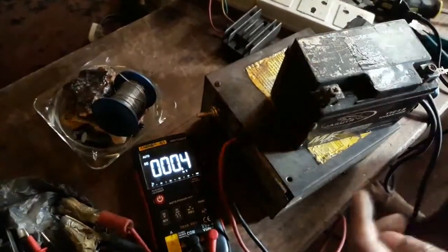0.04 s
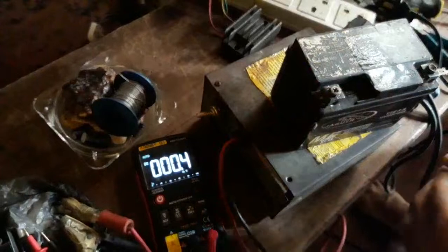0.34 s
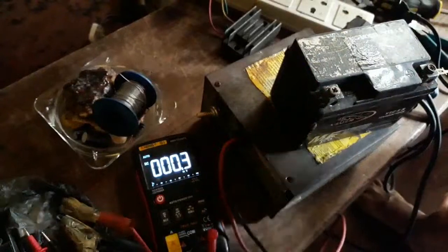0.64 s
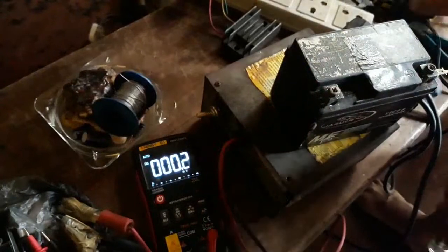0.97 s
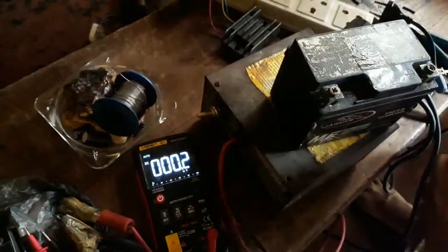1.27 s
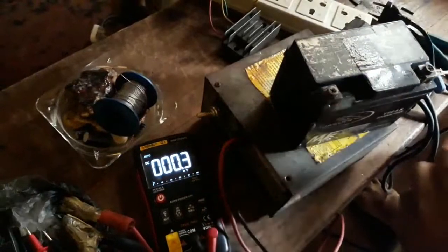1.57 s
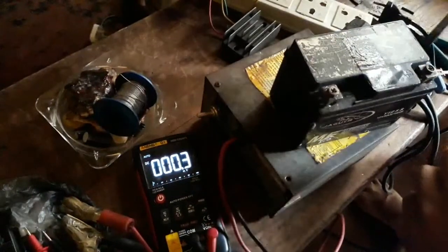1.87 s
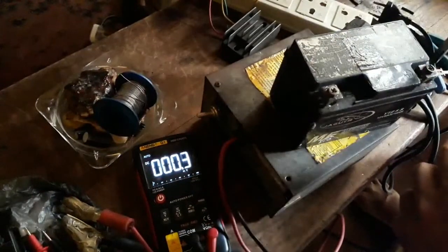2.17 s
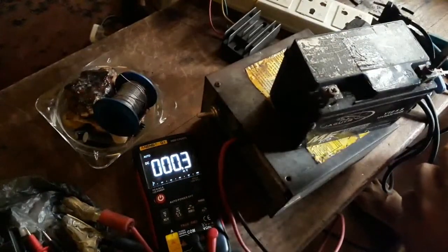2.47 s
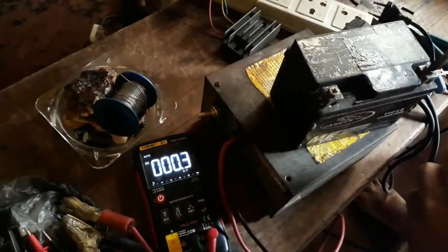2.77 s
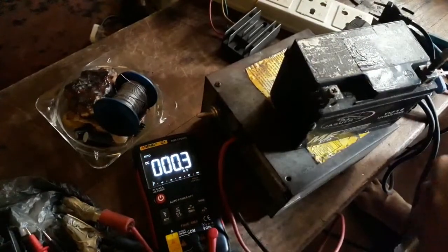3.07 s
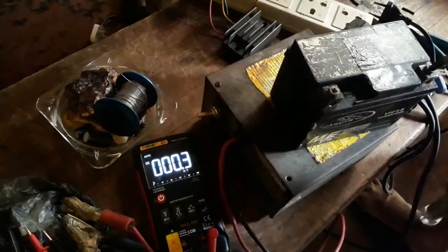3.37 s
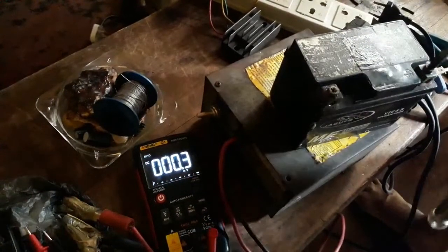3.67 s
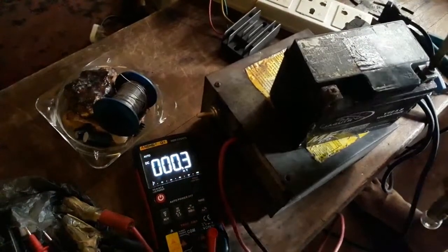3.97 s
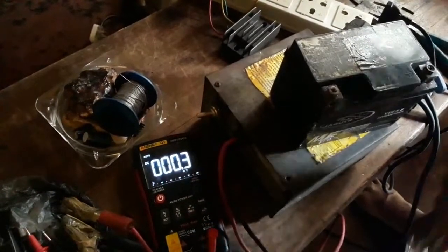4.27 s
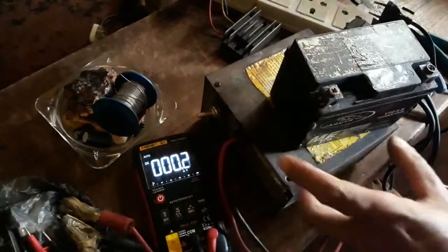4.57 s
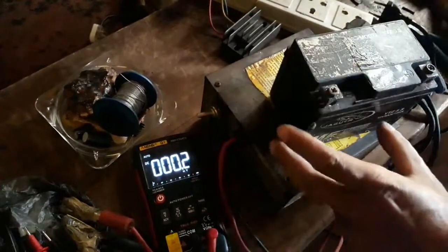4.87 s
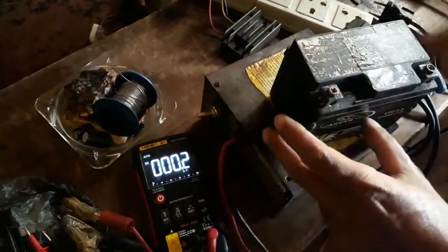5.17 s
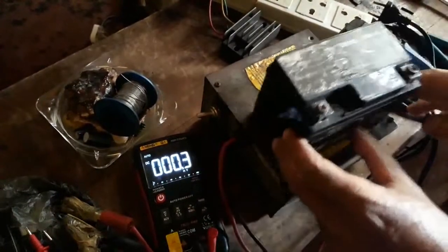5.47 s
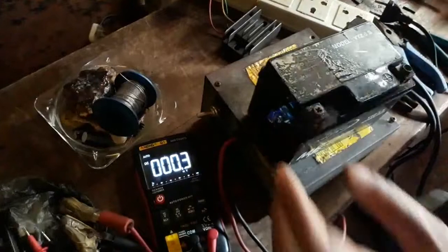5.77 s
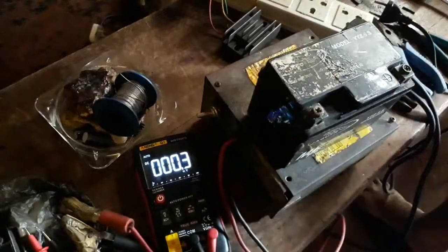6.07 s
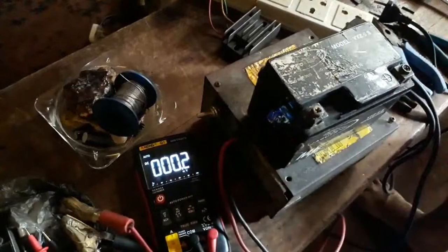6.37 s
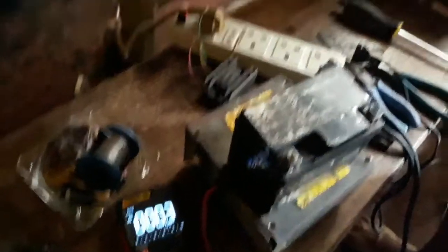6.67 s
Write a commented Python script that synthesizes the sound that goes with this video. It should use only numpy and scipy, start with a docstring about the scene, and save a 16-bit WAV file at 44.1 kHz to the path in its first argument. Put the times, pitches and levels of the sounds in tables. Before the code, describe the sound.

Light clicks and clatters of clip leads on a wooden bench, followed by a knock and a battery's short, jerky scrape.

```python
"""Leads are handled at a small battery that lies on a sheet-metal case on a wooden workbench.
From the start, metal clips tick and land, and cables bump the wood and slide through the fingers.
Just after 1 s a plastic plug clatters down. Near 5 s a hand knocks the battery and a thin metal part
pings; the battery rocks, then scrapes and groans as it is pushed across the case in four jerks.
After 6 s more clips and cables land. A quiet hiss fills the small room throughout."""
import sys
import numpy as np
from scipy import signal
from scipy.fft import rfft, irfft
from scipy.io import wavfile
from scipy.ndimage import uniform_filter1d

SR = 44100
rng = np.random.default_rng(int(sys.argv[2]) if len(sys.argv) > 2 else 0)


def store_pcm(level_fs):
    """Save levels as 16-bit WAV."""
    pcm = np.round(np.clip(level_fs, -1, 1) * 32767).astype(np.int16)
    wavfile.write(sys.argv[1], SR, np.atleast_2d(pcm).T)


N = 296352

# Strengths and gains are relative. A ring_s or rattle_s is the time to fade by 60 dB.
# A blow is weak below low_hz and above bright_hz; the spot that is struck favours spot_hz.
# the hand's knock: start_s, strength_db, low_hz, bright_hz, ring_s, room_db, spot_hz
HAND_KNOCK = [(4.9545, 25, 180, 338, 0.01, -16, 430), (4.9595, 15, 129, 980, 0.048, -3, 162),
              (4.9642, 19, 215, 880, 0.15, -7, 415)]
# the plug landing: start_s, strength_db, low_hz, bright_hz, ring_s, room_db, spot_hz
PLUG_HITS = [(1.1068, 12.5, 150, 1630, 0.052, 3, 855), (1.1098, 12.5, 150, 990, 0.041, -4, 342),
             (1.2826, 19, 266, 2310, 0.053, -4.5, 1660), (1.2852, 15.5, 264, 1960, 0.014, -5.5, 1370),
             (1.2885, 9, 232, 1020, 0.044, -11, 272), (1.3153, 4.5, 500, 2200, 0.033, 2, 1950),
             (1.3183, 15.5, 346, 1900, 0.044, -13, 523)]
# the battery rocking: start_s, strength_db, spot_hz
BATTERY_HITS = [(5.1243, 2, 560), (5.1521, 13, 700), (5.176, 3, 620), (5.2987, 9, 165), (5.3989, 4, 573),
                (5.4648, -0.5, 165), (5.553, 5.5, 730), (5.797, -7.5, 530)]
# jerks of the pushed battery: middle_s, length_s, scrape_db, groan_hz, groan_db
SHOVES = [(5.521, 0.066, -40, 870, -46.5), (5.59, .04, -42.5, 1197, -48), (5.637, 0.052, -43.5, 1240, -45),
          (5.684, 0.06, -49.5, 1413, -54)]
# clips landing, a thud under a tick: start_s, rattle_s, thud_db, thud_low_hz, thud_bright_hz,
# thud_spot_hz, tick_db, tick_bright_hz, tick_spot_hz
CLIP_LANDINGS = [(0.2308, 0.065, 2.5, 256, 507, 513, -25, 4500, 2150),
                 (1.0837, 0.073, 2, 150, 480, 177, -16.5, 4500, 2920),
                 (1.5424, .014, -3.5, 500, 2010, 1410, -4, 2900, 3900),
                 (2.3583, 0.015, -0.5, 223, 740, 540, -29, 7000, 3200),
                 (2.5346, 0.021, -2.5, 218, 1190, 820, -25.5, 5950, 2240),
                 (2.7853, .085, 10.5, 120, 1170, 854, -4.5, 7550, 3150),
                 (2.818, 0.025, 8, 170, 680, 526, -21, 7000, 3400),
                 (3.9124, 0.045, -4, 160, 750, 288, -11, 2900, 3300),
                 (4.3433, .035, -8.5, 180, 1120, 830, -18.5, 8000, 3060),
                 (6.394, 0.24, 1.5, 230, 790, 1390, -41, 4000, 2400),
                 (6.5809, .016, 7.5, 260, 740, 1050, -11.5, 5960, 2720),
                 (6.5875, .02, 15.5, 300, 540, 384, -10, 3500, 1660),
                 (6.6189, .011, -0.5, 300, 650, 585, -7, 6400, 4600)]
# sharp ticks from the clips, the landing plug and the knock on the battery:
# start_s, strength_db, bright_hz, rattle_s, spot_hz
SHARP_TICKS = [(.1222, -25, 11000, .01, 3450), (1.108, -3.5, 2700, 0.16, 2970),
               (1.2825, -17.5, 7000, .03, 4170), (1.6572, -24, 4000, .033, 2550),
               (1.7256, -25, 8000, 0.017, 4180), (2.9174, -26, 4500, .025, 3300),
               (3.1628, -18.5, 6100, 0.018, 2570), (3.386, -24, 3500, .025, 1700),
               (3.9136, -17.5, 17000, 0.0078, 11700), (4.3785, -12, 9600, 0.0079, 3300),
               (4.957, -6.5, 6000, .05, 2320), (4.9632, -14, 9000, 0.023, 4600),
               (5.69, -22.5, 11000, 0.022, 4030), (6.6495, -12, 2200, 0.0062, 1530)]
# cables bumping the bench: start_s, strength_db, spot_hz
CABLE_BUMPS = [(.268, 1, 317), (0.9212, -2, 293), (.947, 2, 310), (1.215, 3, 380), (1.806, -2.5, 328),
               (1.931, -3.5, 306), (2.84, 3, 290), (4.2483, -7.5, 300), (6.27, -4, 262), (6.6763, 7.5, 374)]
# cables moving through the fingers and over the wood: middle_s, length_s, strength_db
SLIDES = [(.6, .16, -72.5), (1.56, 0.5, -71.5), (2.935, 0.059, -61.5), (3.055, 0.055, -58),
          (3.215, 0.064, -59), (3.295, 0.038, -63), (3.35, 0.067, -62), (3.42, .05, -67), (4.345, .11, -72),
          (5.215, 0.16, -59)]
SHUFFLES = [(.02, 0.087, -57.5), (1.24, 0.17, -45), (1.52, 0.43, -57.5), (2.86, 0.35, -52),
            (3.3, 0.53, -61), (4.32, 0.27, -56.5), (4.75, 0.11, -58.5), (5.55, 0.51, -54.5),
            (6.58, 0.75, -55)]

# the clear notes each thing rings with: pitch_hz, gain_db, ring_s
BATTERY_NOTES = [(160, 2.5, 0.14), (500, 4, 0.14), (581, -0.5, 0.31), (642, -3, 0.16), (728, -6, 0.24),
                 (900, 3.5, 0.25), (1240, 8.5, 0.21), (2490, -2, 0.094), (3320, -2, .03), (4170, 3, .03)]
PING_NOTES = [(4710, -48.5, 0.28), (4670, -38, 0.068), (8452, -51, 0.24), (8570, -51, 0.17),
              (7900, -56, .1)]
PLUG_NOTES = [(268, -25, 0.25), (626, 0, 0.25), (785, 10, 0.14), (886, 9, 0.21), (1190, 4.5, 0.22),
              (1290, 13, 0.32), (1370, 12, 0.25), (1696, 4, 0.24), (1753, 9, 0.27), (1900, 5.5, 0.34),
              (2152, 16, 0.24)]
BENCH_NOTES = [(165, 5, 0.12), (241.4, -11, 0.44), (300, 3, 0.2), (418, 2, 0.23), (546, -1, 0.2),
               (653, 2.5, 0.23), (790, 1, 0.16), (924, 3, .16), (1050, -19, 0.17)]
TICK_NOTES = [(3150, 0, 0.024), (3300, 12, 0.026), (4150, 17, 0.044), (11100, 3, 0.03)]
# the colour (mix of bass and treble) of each kind of blow: frequency_hz, gain_db
BATTERY_COLOUR = [(100, -5), (170, 2), (280, -4.5), (370, -15.5), (490, -0.5), (740, -0.5), (1000, -6.5),
                  (1250, -8.5), (1700, -16), (2600, -11), (4000, -17), (15000, -22)]
PLUG_COLOUR = [(100, -9.5), (290, 1.5), (480, -3.5), (850, 0), (1100, -6), (1350, -1.5), (1700, -2.5),
               (2150, -4), (2800, -10.5), (3900, -24), (7000, -22), (15000, -46.5)]
BENCH_COLOUR = [(100, -5), (300, 0), (400, -4.5), (480, -3.5), (650, -6), (900, -4), (1400, -4), (2000, -4),
                (3000, -1.5), (5000, -7), (15000, -9)]
TICK_COLOUR = [(500, 2), (2000, -1.5), (3200, -3), (5500, -7), (7500, -5), (10500, -2), (12500, -5),
               (15000, -10)]
# the colour of each rubbing sound and steady noise: frequency_hz, gain_db
SCRAPE_COLOUR = [(88, -42), (150, -28), (186, -26), (302, 1.5), (352, -23), (462, -5), (572, -9),
                 (860, 4.5), (1040, -5.5), (1220, -9), (1450, -5.5), (3280, -17), (4840, -25),
                 (8330, -26.5), (15500, -47)]
SLIDE_COLOUR = [(500, -30), (2000, -4), (4000, -6.5), (6500, -2.5), (9000, 2.5), (12000, -1), (15500, -5.5)]
SHUFFLE_COLOUR = [(60, -6), (150, 4.5), (260, 7), (450, -1.5), (850, -3.5), (1300, -10), (2200, -17.5),
                  (4000, -24), (9000, -31)]
ROOM_COLOUR = [(20, -40), (45, -5), (75, 2), (115, -0.5), (160, -5.5), (260, -7.5), (420, -15), (520, -10),
               (700, -14), (860, -12), (1500, -18.5), (3000, -25.5), (5000, -33), (15500, -37)]
MICROPHONE_COLOUR = [(40, -16), (200, -2), (1500, -1), (3500, -0.5), (6000, -6.5), (8500, -15), (13000, -8),
                     (15500, -8.5)]
# how long the room echoes: frequency_hz, ring_s
ROOM_ECHO = [(100, 0.16), (350, 0.28), (800, 0.31), (1500, 0.31), (4000, 0.32), (12000, 0.19)]

BLOW_SAMPLES = 32768
BLOW_S, BLOW_HZ = np.arange(BLOW_SAMPLES) / SR, np.fft.rfftfreq(BLOW_SAMPLES, 1 / SR)
SCENE_S, SCENE_HZ = np.arange(N) / SR, np.fft.rfftfreq(N, 1 / SR)


def hand_knock():
    """A hand knocks the battery, and the case under it thumps the bench."""
    return bench_blows(HAND_KNOCK)


def battery_rocking(low_hz=135, room_db=-5):
    """The battery rocks on the case: a harder blow is brighter and shorter."""
    hits = [(s, db, low_hz, 786 * amp(db) ** 0.29, 0.045 / amp(db) ** 0.52, room_db, spot_hz)
            for s, db, spot_hz in BATTERY_HITS]
    return blows(hits, BATTERY_COLOUR, BATTERY_NOTES,
                 notes_db=-17.5, push_db=-11.5, spot_db=8, spot_sharpness=14, build_s=0.00031)


def battery_scrape(notes_db=-5, hiss_db=-61):
    """The battery's base catches and slips, hissing and ringing the same notes as when it rocks."""
    slips = unit(friction(slips_per_s=700, spread_db=-0.5, rub_share=1))
    ringing = unit(signal.oaconvolve(slips, ring(BATTERY_NOTES))[:N])
    scrape = unit(tint(slips, curve(SCRAPE_COLOUR, SCENE_HZ)) + amp(notes_db) * ringing)
    hiss = tint(slips, curve(SLIDE_COLOUR, SCENE_HZ))
    moving = sum(stroke(s, length_s) for s, length_s, *_ in SHOVES)
    return strokes(SHOVES) * scrape + amp(hiss_db) * moving * hiss


def battery_groan(jitter=0.0398, flutter=0.54, length_share=0.79, rise_per_s=2):
    """In the middle of each jerk, the slips come almost evenly and speed up, making a rising note."""
    waver = 1 + jitter * unit(smooth(rng.standard_normal(N), size=70))
    grip = 1 + flutter * unit(smooth(rng.standard_normal(N), size=150))
    out = np.zeros(N)
    for s, length_s, _, hz, db in SHOVES:
        pitch_hz = hz * waver * (1 + rise_per_s * (SCENE_S - s))
        note = unit(grip * np.sin(2 * np.pi * np.cumsum(pitch_hz) / SR))
        out += amp(db) * stroke(s, length_share * length_s) * note
    return out


def metal_ping():
    """The knock on the battery sets a thin metal part ringing."""
    return ring(PING_NOTES)


def plug_clatter():
    """A hard plastic plug lands in a few quick blows."""
    return blows(PLUG_HITS, PLUG_COLOUR, PLUG_NOTES,
                 notes_db=-14.5, push_db=-7, spot_db=10.5, spot_sharpness=9.3, build_s=0.00033)


def sharp_ticks(low_share=0.5, room_db=-6.5):
    """The clips, the landing plug and the knock on the battery make short, high ticks."""
    landings = [(s, db, bright_hz, rattle_s, spot_hz)
                for s, rattle_s, *_, db, bright_hz, spot_hz in CLIP_LANDINGS]
    hits = [(s, db, low_share * spot_hz, bright_hz, rattle_s, room_db, spot_hz)
            for s, db, bright_hz, rattle_s, spot_hz in landings + list(SHARP_TICKS)]
    return blows(hits, TICK_COLOUR, TICK_NOTES,
                 notes_db=-18.5, push_db=-17, spot_db=11, spot_sharpness=15.3, build_s=0.00036)


def clip_thuds(extra_ring_s=0.045, room_db=-8.5):
    return bench_blows([(s, db, low_hz, bright_hz, rattle_s + extra_ring_s, room_db, spot_hz)
                        for s, rattle_s, db, low_hz, bright_hz, spot_hz, *_ in CLIP_LANDINGS])


def cable_bumps(low_share=0.85, bright_hz=423, ring_s=0.1, room_db=-2.5):
    """Cables are soft, so their bumps on the bench sound dull."""
    return bench_blows([(s, db, low_share * spot_hz, bright_hz, ring_s, room_db, spot_hz)
                        for s, db, spot_hz in CABLE_BUMPS])


def cable_rubbing(slide_db=-1, stir_db=-69.5):
    """Cable hisses through the fingers while the slack shuffles on the wood, never quite still."""
    slide = tint(friction(slips_per_s=700, spread_db=1, rub_share=1), curve(SLIDE_COLOUR, SCENE_HZ))
    shuffle = tint(friction(slips_per_s=260, spread_db=3, rub_share=1.3), curve(SHUFFLE_COLOUR, SCENE_HZ))
    return amp(slide_db) * slide * strokes(SLIDES) + shuffle * (amp(stir_db) + strokes(SHUFFLES))


def room_tone(level_db=-58, hiss_hz=6906, width_hz=436, boost_db=12.8):
    """The room's steady low noise, with a narrow band of hiss on top."""
    hiss_db = boost_db * np.exp(-((SCENE_HZ - hiss_hz) / width_hz) ** 2)
    return amp(level_db) * tint(rng.standard_normal(N), curve(ROOM_COLOUR, SCENE_HZ) + hiss_db)


def microphone_hiss(level_db=-75):
    """Each of the two microphones adds its own faint hiss."""
    colour_db = curve(MICROPHONE_COLOUR, SCENE_HZ)
    return amp(level_db) * np.array([tint(rng.standard_normal(N), colour_db) for _ in range(2)])


def bench_blows(hits):
    """The wooden bench answers each blow with its own low notes."""
    return blows(hits, BENCH_COLOUR, BENCH_NOTES,
                 notes_db=-20, push_db=-5, spot_db=9.5, spot_sharpness=8.2, build_s=0.00054)


def blows(hits, colour, notes, notes_db, push_db, spot_db, spot_sharpness, build_s):
    """Each blow is a push, a rattle of many crowded notes, a few clear notes and the room's echo."""
    out = np.zeros(N)
    clear_notes = rfft(amp(notes_db) * unit(ring(notes))) / np.sqrt(BLOW_SAMPLES)
    push = amp(push_db) * unit(1. * (BLOW_S == 0))
    for s, db, low_hz, bright_hz, ring_s, room_db, spot_hz in hits:
        rise_and_fade = (1 - np.exp(-BLOW_S / build_s)) * np.exp(-np.log(1000) * BLOW_S / ring_s)
        rattle = unit(rng.standard_normal(BLOW_SAMPLES) * rise_and_fade)
        crowd = rfft(push + rattle)
        # spread the energy evenly from bass to treble
        crowd *= causal_filter(1 / np.sqrt(smooth(abs(crowd) ** 2, size=130)))
        off_pitch = 2 * spot_sharpness * (BLOW_HZ / spot_hz - 1)
        spot_boost = np.sqrt(1 + amp(spot_db) ** 2 / (1 + off_pitch ** 2))
        echo = amp(room_db) * rfft(room_echo()) / np.sqrt(BLOW_SAMPLES)
        body = (crowd * causal_filter(spot_boost) + echo) / np.hypot(1, amp(room_db)) + clear_notes
        # small parts give off little bass; a soft, long contact makes little treble
        band = 1 / np.sqrt((1 + (low_hz / (BLOW_HZ + 1)) ** 6) * (1 + (BLOW_HZ / bright_hz) ** 4))
        tone = causal_filter(band * amp(curve(colour, BLOW_HZ)))
        add(out, s, amp(db) * irfft(body * tone))
    return out


def room_echo(build_s=0.0076):
    """A wash of echoes builds quickly and dies soonest in the deep bass and high treble."""
    hz, t, noise = signal.stft(rng.standard_normal(BLOW_SAMPLES), SR, nperseg=256)
    fade = np.exp(-np.log(1000) * t / curve(ROOM_ECHO, hz)[:, None])
    tail = signal.istft(noise * fade, SR, nperseg=256)[1][:BLOW_SAMPLES]
    return unit(tail * (1 - np.exp(-BLOW_S / build_s)))


def friction(slips_per_s, spread_db, rub_share):
    """Tiny slips of uneven size over a smooth rub."""
    slips = (rng.random(N) < slips_per_s / SR) * rng.choice([-1, 1], N)
    sizes = amp(spread_db * np.minimum(rng.exponential(1, N), 4))
    return unit(slips * sizes) + rub_share * rng.standard_normal(N)


def ring(notes):
    """Pure tones that start together and die away."""
    return sum(amp(db - 60 * BLOW_S / ring_s) * np.sin(2 * np.pi * hz * BLOW_S)
               for hz, db, ring_s in notes)


def stroke(middle_s, length_s, roundness=1.65):
    """A hand movement gathers speed, then slows again."""
    return np.exp(-abs(2 * (SCENE_S - middle_s) / length_s) ** roundness)


def strokes(rows):
    """The rising and falling level of a series of movements."""
    return sum(amp(db) * stroke(s, length_s) for s, length_s, db, *_ in rows)


def amp(db):
    """Turns decibels into a multiplier."""
    return 10 ** (np.asarray(db) / 20)


def unit(x):
    """Scales a sound to an average power of 1."""
    return x / np.sqrt(np.mean(x ** 2) + 1e-20)


def curve(points, hz):
    """Reads between a table's points, spacing frequencies by octaves."""
    point_hz, values = np.transpose(points)
    return np.interp(np.log(hz + 1), np.log(point_hz + 1), values)


def add(mix, start_s, sound):
    """Mixes a sound in at its start time."""
    part = mix[max(round(start_s * SR), 0):][:len(sound)]
    part += sound[:len(part)]


def tint(x, db):
    """Colours a full-length sound and scales it to a power of 1."""
    return unit(irfft(rfft(x) * amp(db), N))


def causal_filter(gain):
    """A filter with these gains that lets nothing sound before the blow."""
    log_gain = np.log(np.maximum(gain, 1e-5))
    mirrored = np.r_[log_gain, log_gain[-2:0:-1]]
    return np.exp(np.conj(signal.hilbert(mirrored)))[:len(gain)]


def smooth(x, size):
    """Averages neighbouring values, twice over."""
    return uniform_filter1d(uniform_filter1d(x, size), size)


def scene():
    """Both channels hear the same sources, each over its own hiss."""
    mix = room_tone() + cable_rubbing() + amp(-1) * battery_scrape() + battery_groan()
    mix += plug_clatter() + clip_thuds() + cable_bumps()
    mix += hand_knock() + battery_rocking() + sharp_ticks()
    add(mix, start_s=4.964, sound=metal_ping())
    return mix + microphone_hiss()


def record(dry):
    """Cuts away the very highest treble."""
    treble_cut = signal.firwin(511, cutoff=15900, window=("kaiser", 9), fs=SR)
    return signal.oaconvolve(dry, treble_cut[None], "same")


dry = scene()
out = record(dry)
store_pcm(out)
```